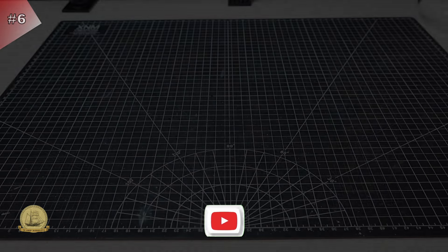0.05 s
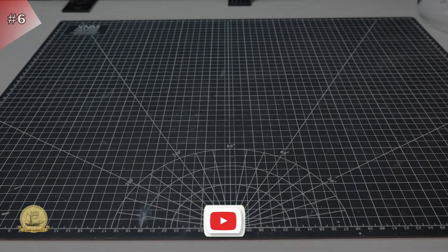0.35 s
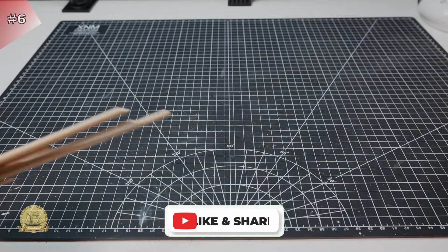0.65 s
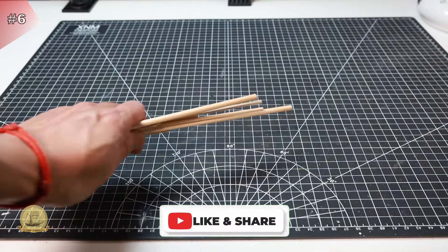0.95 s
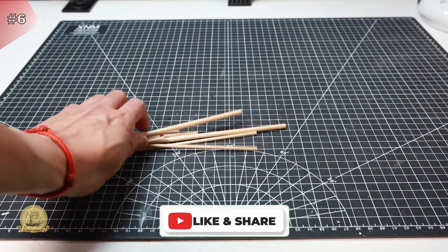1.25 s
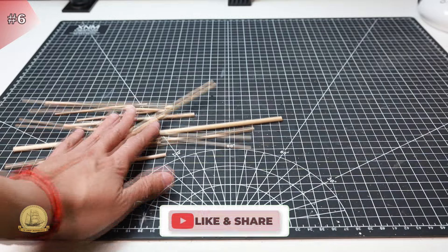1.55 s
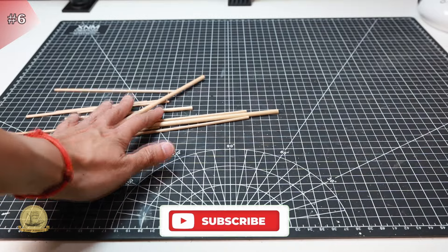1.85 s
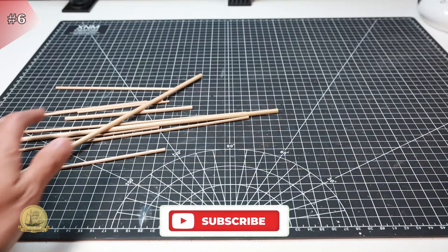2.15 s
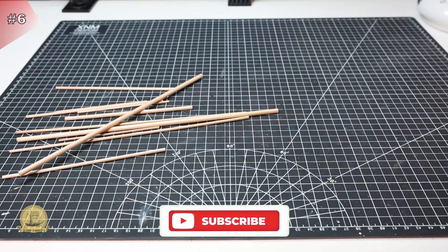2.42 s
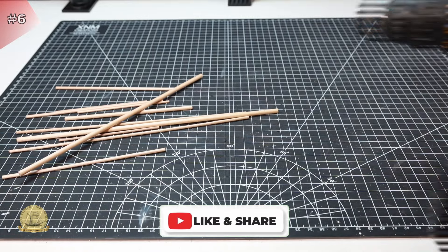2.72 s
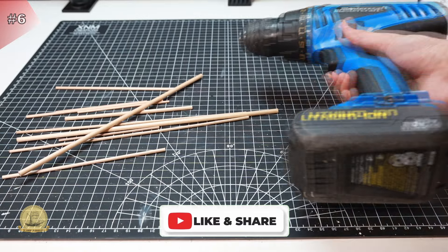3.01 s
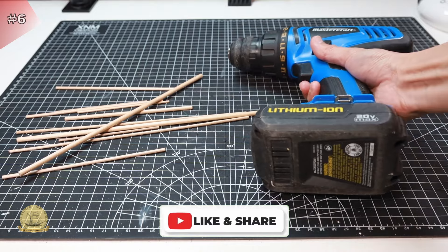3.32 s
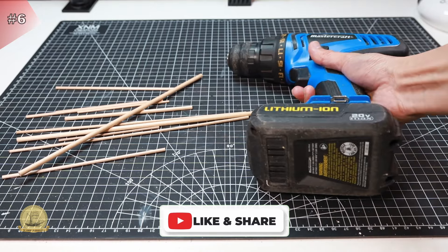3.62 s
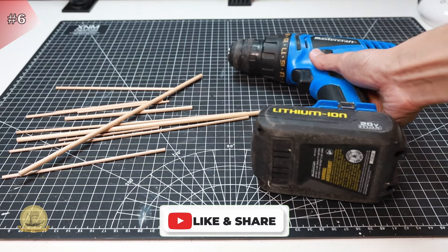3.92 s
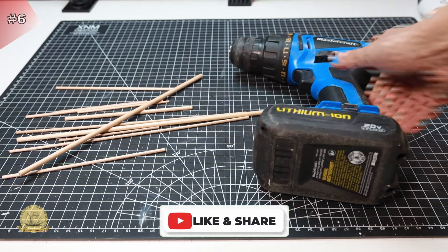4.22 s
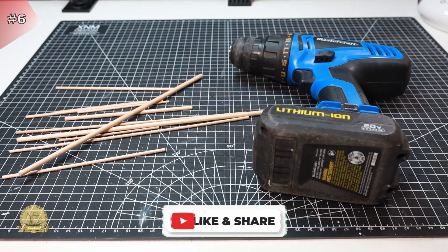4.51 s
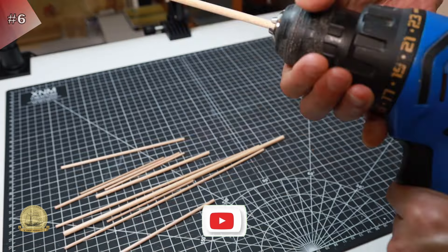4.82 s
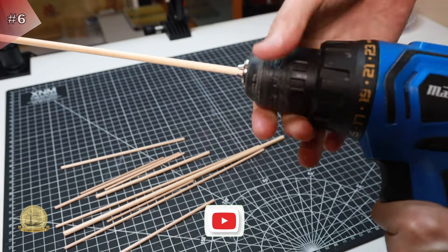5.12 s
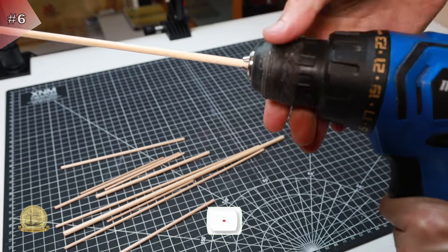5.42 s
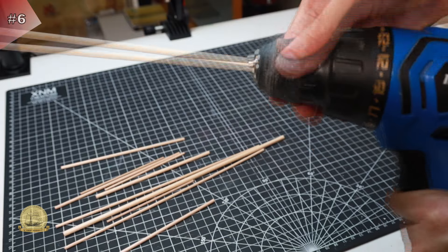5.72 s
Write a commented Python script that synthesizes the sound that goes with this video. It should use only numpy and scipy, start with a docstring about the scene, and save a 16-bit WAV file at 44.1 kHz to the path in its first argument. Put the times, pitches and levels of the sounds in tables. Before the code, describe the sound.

Faint room hiss with a very thin, high whine runs throughout. At about 1.2 seconds a few light wooden clacks lead into a sharp, ringing clatter as a handful of dowels lands on a cutting mat and bounces. A hand rolls them apart, with clicks and a light rattle until about 2 seconds. Small plastic clicks come from a cordless drill between 2.5 and 3.4 seconds. The drill is stood on the desk with two booming knocks at 3.4 and 3.6 seconds, followed by softer bumps just after 4 seconds and the faint rub of a palm on the grip. From about 4.9 seconds to the end, near 5.8, the chuck is twisted tight in about seven short, dry rasps, while the battery bumps the desk with repeated low thuds. Everything is close to one microphone in a small room.

```python
"""A few wooden clacks over quiet room hiss, then a handful of dowels lands on a cutting mat, bounces
and is rolled apart by hand, every contact ringing the rods. Plastic clicks, and a cordless drill is
stood on the desk in two knocks that boom the top and sway the legs. Its chuck is twisted tight round
a dowel in short stick-slip rasps while a palm rubs the grip and the battery bumps the desk.
Small room, one close microphone."""
import sys
import numpy as np
from scipy import signal
from scipy.fft import rfft, irfft
from scipy.io import wavfile

SR = 44100
rng = np.random.default_rng(int(sys.argv[2]) if len(sys.argv) > 2 else 0)


def store_pcm(level_fs):
    """Save levels as 16-bit WAV."""
    pcm = np.round(np.clip(level_fs, -1, 1) * 32767).astype(np.int16)
    wavfile.write(sys.argv[1], SR, np.atleast_2d(pcm).T)


N = 253795
T = np.arange(N) / SR
LANDING_S = 1.2886   # the bundle hits the mat

# spectrum of still room air and hiss: frequency_hz, level_db
AIR = [(15, -28), (25, -3), (86, -1.5), (116, -2.5), (289, -6.5), (349, -8.5), (469, -10), (552, -7),
       (782, -12), (848, -12.5), (945, -14), (2920, -20.5), (13200, -26.5), (15500, -31)]


def from_db(db):
    """Decibels to gain."""
    return 10 ** (np.asarray(db) / 20)


def unit(x):
    """Scale to energy 1."""
    return x / np.sqrt(np.sum(x ** 2) + 1e-20)


def curve(points):
    """Draw a line through (time, value) points at every sample."""
    return np.interp(T, *np.transpose(points))


def at_hz(points, hz):
    """Read a table on a log-frequency axis."""
    f, value = np.transpose(points)
    return np.interp(np.log(np.maximum(hz, 1)), np.log(f), value)


def add(track, start_s, sound):
    """Mix a sound into a track."""
    i = int(start_s * SR)
    track[i:i + len(sound)] += sound[:N - i]


def placed(peak_s, cluster, response=(1,)):
    """A track holding one burst, centred on peak_s, sounding through a response."""
    track = np.zeros(N)
    add(track, peak_s - len(cluster) / 2 / SR, signal.fftconvolve(cluster, response))
    return track


def through(x, response):
    """Pass a signal through an impulse response."""
    return signal.fftconvolve(x, response)[:len(x)]


def soften(x, hz, order=1):
    """Low-pass: a softer contact loses treble."""
    return signal.sosfilt(signal.butter(order, np.clip(hz, 20, .45 * SR), fs=SR, output="sos"), x)


def band(x, low_hz, high_hz):
    """Keep one band of frequencies."""
    return signal.sosfilt(signal.butter(2, [low_hz, high_hz], "band", fs=SR, output="sos"), x)


def colour(spectrum, size=8192):
    """Causal (minimum-phase) response with the given spectrum, energy 1."""
    gain = from_db(at_hz(spectrum, np.fft.rfftfreq(size, 1 / SR)))
    cepstrum = irfft(np.log(gain))
    cepstrum[1:size // 2] *= 2
    cepstrum[size // 2 + 1:] = 0
    return unit(irfft(np.exp(rfft(cepstrum))))


def ringing(modes, scatter_db=0, detune=0, size=26000):
    """Decaying modes; where a blow lands and how the piece rests vary their strength and pitch."""
    hz, db, t60 = np.transpose(modes)[:, :, None]
    t = T[:size]
    strength = from_db(db + scatter_db * rng.standard_normal(hz.shape))
    hz = hz * (1 + detune * rng.standard_normal(hz.shape))
    signs = (-1) ** np.arange(len(hz))[:, None]   # neighbouring modes move in opposite directions
    decay = np.exp(-np.log(1000) * t / np.maximum(t60, .005))
    return np.sum(signs * strength * np.cos(2 * np.pi * hz * t) * decay, axis=0)


def grains(size, spread_db):
    """Tiny contacts of uneven strength, rms 1."""
    noise = rng.standard_normal(size)
    strength = from_db(spread_db * np.clip(rng.standard_normal(size), -2, 2))
    return unit(noise * strength) * np.sqrt(size)


def burst(swell_s, fall_s, spread_db, size=4096):
    """A cluster of contacts whose envelope peaks at 1 in the middle of its window."""
    t = T[:size] - T[size // 2]
    envelope = np.exp(np.minimum(t / max(swell_s, 1e-5), -t / fall_s))
    return unit(envelope * grains(size, spread_db)) * np.sqrt(np.sum(envelope ** 2))


def gesture(start_s, length_s, rise_s, fall_s):
    """Envelope of one movement: rises, holds to the end of its length, dies away."""
    rise = np.clip((T - start_s) / rise_s, 0, 1)
    return rise * np.exp(-np.maximum(T - start_s - length_s, 0) / fall_s)


def wander(hz, order=1):
    """Slow random motion, rms 1."""
    return np.sqrt(N) * unit(soften(rng.standard_normal(N), hz, order))


def background(air_db=-61, whine_db=-73, waver_hz=14):
    """Room air and hiss, with a thin, wavering electronic whine."""
    # path of the whine: time_s, pitch_hz
    whine_path = [(0, 13795), (4.85, 13775), (4.87, 13501), (5.75, 13501)]
    # hiss and whine sink a little during the chuck work: time_s, level_db
    level_ride = [(0, 0), (4.85, 0.5), (4.88, -2), (5.75, -2.5)]
    air = from_db(air_db) * through(rng.standard_normal(N), colour(AIR))
    pitch_hz = curve(whine_path) + waver_hz * wander(hz=30)
    whine = from_db(whine_db) * np.sin(2 * np.pi * np.cumsum(pitch_hz) / SR)
    return from_db(curve(level_ride)) * (air + whine)


def dowel_contacts(bounces=8, gap_s=.0115, bounce_db=-23.5, loss_db_per_s=142):
    """Rods clack together; the bundle lands flat and bounces ever more weakly.
    Rows: peak_s, level_db, fall_s, brightness_hz, heap_ring_db, stick_ring_db, pitch_hz."""
    # dowel striking dowel: peak_s, level_db, brightness_hz, ring_db, pitch_hz (lowest mode)
    clacks = [(1.1796, -46.5, 11000, -3, 3560), (1.2373, -38, 3000, 3.5, 1696),
              (1.2698, -47, 7000, 7, 2350), (1.279, -39, 6000, 2, 2860), (1.4295, -42.5, 10100, -3, 2070),
              (1.468, -42.5, 6000, -8, 2330), (1.501, -39, 9000, -5.5, 3560),
              (1.532, -40.5, 7000, -4, 2380), (1.566, -33.5, 4520, -12, 1910),
              (1.6712, -29, 3400, -2.5, 3330), (1.700, -44, 5000, -2, 3330), (1.7125, -40, 8000, -4, 3430),
              (1.7287, -39, 8000, -1.5, 3500), (1.765, -46, 4000, -9, 3480),
              (1.775, -50.5, 7000, 1.5, 3390), (1.861, -44.5, 8050, 2, 3460),
              (2.003, -45.5, 2490, -16, 2000)]
    clack_fall_s, neighbours_db = .006, -5.5   # the rods around ring less than the struck one
    free_heap_db, free_stick_db = 6.5, -1.5   # ring of the rods while they lie free
    rows = [(peak_s, level_db, clack_fall_s, bright_hz, ring_db + neighbours_db, ring_db, pitch_hz)
            for peak_s, level_db, bright_hz, ring_db, pitch_hz in clacks]
    rows.append((LANDING_S, -17, .0037, 15750, free_heap_db, free_stick_db, 2930))
    for k, (jitter, thickness) in enumerate(rng.uniform(-.3, .3, (bounces, 2))):
        delay_s = gap_s * (k + .5 + jitter)
        level_db = bounce_db - loss_db_per_s * delay_s
        pitch_hz = 2930 * (1 + thickness)
        rows.append((LANDING_S + delay_s, level_db, .003, 12000, free_heap_db, free_stick_db, pitch_hz))
    return rows


def dowels(rattle_ring_db=-3, detune=.025, ring_samples=6000):
    """Each contact cracks and rings the rods, no two alike; rolling, they rattle and rumble."""
    # bending modes of the heap: pitch_hz, level_db, t60_s
    heap_modes = [(970, -17, 0.1), (1488, -12, 0.16), (1820, -13, 0.12), (2513, -9, .15), (2780, -7, 0.057),
                  (3340, -8, 0.17), (4125, -5, .15), (3934, 2.5, 0.077), (4140, -7, 0.19),
                  (4910, -2.5, 0.1703), (5240, -1.5, 0.15), (5400, -15, 0.1), (5450, -0.5, 0.13),
                  (5820, -1, 0.18), (6550, -7, 0.19), (7260, -1.5, 0.17), (7530, -2.5, .14),
                  (7510, -2.5, .13), (8160, 0.5, 0.17), (8650, -0.5, 0.22), (8970, -0.5, 0.065),
                  (10000, -20.5, 0.099), (10320, -0.5, 0.1), (10550, 0.5, .13), (11450, 0, 0.079),
                  (13300, -9, 0.097), (14280, -22, 0.098)]
    # bending modes of one stick: ratio_to_lowest_mode, level_db, t60_s
    stick_modes = [(1, -4, .07), (1.68, -2, .06), (1.73, -6, .06), (2.33, -3, .07), (2.40, -2, .08),
                   (2.48, -3, .08), (3.12, -8, .06), (3.28, -7, .06)]
    # spectrum of bare wood contact: frequency_hz, level_db
    crack_spectrum = [(25, -45.5), (60, -20), (150, -4.5), (400, 1.5), (900, 3.5), (2200, 0.5), (4500, 2.5),
                      (8000, -2), (11000, -13), (13000, -11), (16000, -15)]
    # spectrum of rolling on the mat: frequency_hz, level_db
    rumble_spectrum = [(20, -51), (50, -29), (100, -13.5), (150, 1), (260, -12.5), (430, 0), (650, -16),
                       (1400, -10.5), (3000, -24), (16000, -85)]
    rattle, rumble = rolling()
    crack = colour(crack_spectrum, ring_samples)
    heap = unit(sum(ringing(heap_modes, detune=detune, size=ring_samples) for _ in range(6)))
    wood = through(rattle * grains(N, spread_db=8), crack + from_db(rattle_ring_db) * heap)
    for peak_s, level_db, fall_s, bright_hz, heap_db, stick_db, pitch_hz in dowel_contacts():
        neighbours = unit(ringing(heap_modes, detune=detune, size=ring_samples))
        stick = unit(ringing(np.array(stick_modes) * [pitch_hz, 1, 1], size=ring_samples))
        contact = from_db(level_db) * soften(burst(0, fall_s, spread_db=.5), bright_hz)
        response = crack + from_db(heap_db) * neighbours + from_db(stick_db) * stick
        wood += placed(peak_s, contact, response)
    return wood + rumble * through(grains(N, spread_db=3.9), colour(rumble_spectrum))


def rolling():
    """Envelopes of rattle and rumble: the tumble after the landing, then each push of the palm."""
    # the palm rolls the dowels apart: start_s, length_s, rattle_db, rumble_db
    pushes = [(1.419, 0.096, -57, -59.5), (1.557, 0.056, -67, -59.5), (1.661, 0.068, -60, -51),
              (1.851, 0.037, -64, -62)]
    tumble = gesture(LANDING_S, length_s=.043, rise_s=.006, fall_s=.046)
    rattle, rumble = from_db(-34) * tumble, from_db(-43.5) * tumble
    for start_s, length_s, rattle_db, rumble_db in pushes:
        push = gesture(start_s, length_s, rise_s=.017, fall_s=.064)
        rattle += from_db(rattle_db) * push
        rumble += from_db(rumble_db) * push
    return rattle, rumble


def clicks_and_twists(twist_bright_hz=6250, ring_t60_s=.006):
    """Plastic clicks and the chuck rasps in stick-slip runs; the grip shifts and damps a resonance."""
    # plastic parts clicking in the hand: peak_s, level_db, brightness_hz, resonance_hz
    clicks = [(2.514, -53, 1990, 1290), (2.742, -47.5, 4020, 3490), (2.750, -41, 7100, 2320),
              (2.9, -55, 4020, 1490), (2.935, -50, 4040, 700), (3.299, -38.5, 1850, 567),
              (3.359, -49.5, 2500, 1860), (3.718, -54.5, 4000, 2980), (5.3676, -45.5, 9100, 4250)]
    # twists of the chuck: peak_s, level_db, swell_s, fall_s, resonance_hz
    twists = [(4.975, -41.5, 0.0029, 0.0075, 2950), (5.133, -39, 0.0025, 0.0077, 3500),
              (5.2798, -38, 0.0038, 0.0039, 3190), (5.4538, -33.5, 0.0037, 0.0018, 4350),
              (5.538, -31, 0.0025, 0.0016, 3920), (5.69, -36.5, 0.0045, 0.0027, 2240),
              (5.7455, -36, 0.0022, 0.0033, 4110)]
    # spectrum of chuck and housing: frequency_hz, level_db
    chuck_spectrum = [(100, -60), (600, -12.5), (1150, 6.5), (1700, 4.5), (2300, 4), (2800, 6.5), (3300, 1),
                      (4100, 3.5), (5500, 1), (7500, -5.5), (10000, -17), (16000, -11)]
    track, housing = np.zeros(N), colour(chuck_spectrum)

    def slip(peak_s, level_db, bright_hz, ring_hz, swell_s, fall_s, ring_db):
        """One run of contacts, heard through the housing and its resonance."""
        contacts = from_db(level_db) * soften(burst(swell_s, fall_s, spread_db=3), bright_hz)
        ring = unit(ringing([(ring_hz, 0, ring_t60_s)], size=8192))
        return placed(peak_s, contacts, housing + from_db(ring_db) * ring)

    for peak_s, level_db, swell_s, fall_s, ring_hz in twists:
        track += slip(peak_s, level_db, twist_bright_hz, ring_hz, swell_s, fall_s, ring_db=-8)
    for click in clicks:
        track += slip(*click, swell_s=.0004, fall_s=.0029, ring_db=-3)
    return track


def drill_knocks(lean_s=4.3, shudder_hz=35.2, tick_db=-11.5, tick_db_per_octave=3.5):
    """The heavy battery sways the desk, booms its top, rings its own case and rattles the shell."""
    # drill meeting the desk: start_s, sway_db, boom_db, case_db, brightness_hz
    knocks = [(3.3900, -38, -19.5, -26, 1770), (3.435, -61, -31, -54, 500),
              (3.5909, -29, -20.5, -26.5, 1510), (4.0349, -40, -32, -47, 1510),
              (4.0721, -58, -32, -48.5, 250), (4.175, -42.5, -50.5, -54.5, 400),
              (4.406, -42, -58, -44.5, 298), (4.442, -35, -51.5, -48.5, 395), (4.588, -32.5, -47, -56, 585),
              (4.8601, -25, -40.5, -40, 715), (5.002, -23, -32.5, -35.5, 340),
              (5.1353, -32.5, -43, -48.5, 400), (5.274, -26, -38.5, -48, 483),
              (5.418, -23.5, -37.5, -37.5, 905), (5.562, -26.5, -37.5, -44.5, 508),
              (5.607, -27.5, -54, -64, 250), (5.6942, -21, -36, -35, 710), (5.736, -20, -53, -45, 400)]
    # modes of the desk top: pitch_hz, level_db, t60_s
    desk_modes = [(138.3, 1.5, 0.18), (151.3, -4.5, 0.27), (230, -16.5, 0.17)]
    # modes of battery case and desk top together: pitch_hz, level_db, t60_s
    case_modes = [(196.7, -6.5, 0.33), (230.6, 0, 0.12), (282.5, -3.5, 0.19), (351, -5.5, 0.11),
                  (406.5, -4, 0.14), (474, -4.5, 0.1), (555, -3.5, 0.055), (684, -6.5, 0.054),
                  (797, -8, 0.076), (966, -4.5, 0.04), (1100, -4.5, 0.028), (1408, -14.5, 0.1),
                  (1590, -9, 0.029), (1945, -7, 0.016)]
    # spectrum of the plastic shell: frequency_hz, level_db
    shell_spectrum = [(30, -43), (100, -23), (300, -9), (700, 1), (1300, 5), (2500, -3), (5000, -7),
                      (8000, -23), (12000, -41), (16000, -34)]
    boom = band(sum(ringing([mode]) for mode in desk_modes), low_hz=81, high_hz=350)
    shudder = soften(ringing([(shudder_hz, -25, .77)]), 2 * shudder_hz, order=2)
    thuds, ticks = np.zeros(N), np.zeros(N)
    for start_s, sway_db, boom_db, case_db, bright_hz in knocks:
        # from lean_s a hand bears on the drill: the sway is lower and shorter, the case rings less
        sway_hz, sway_t60_s, ring_share = (84.05, .69, 1) if start_s < lean_s else (81.5, .28, .85)
        sway = ringing([(sway_hz, sway_db, sway_t60_s)])
        sway = band(sway, low_hz=45, high_hz=150)   # a heavy desk takes a cycle to get going
        case = ringing(np.array(case_modes) * [1, 1, ring_share], scatter_db=3, detune=.014, size=14000)
        add(thuds, start_s, sway + from_db(boom_db) * (boom + shudder))
        add(thuds, start_s, from_db(case_db) * soften(case, bright_hz, order=2))
        hardness = np.log2(bright_hz / 1000)   # harder contacts tick more
        tick_gain = from_db(boom_db + tick_db + tick_db_per_octave * hardness)
        ticks += placed(start_s, tick_gain * burst(0, fall_s=.0047, spread_db=5.5))
    return thuds + through(ticks, colour(shell_spectrum))


def palm(flutter_db=3, flutter_hz=15):
    """Skin rubs softly on rubber and plastic, with uneven pressure."""
    # strokes over the grip: start_s, length_s, level_db
    strokes = [(3.801, .48, -64), (4.395, 0.031, -66), (4.855, 0.036, -60.5), (4.982, 0.081, -55.5),
               (5.29, 0.084, -66), (5.534, .035, -67)]
    # spectrum of rubbing skin: frequency_hz, level_db
    skin_spectrum = [(200, -10), (1000, -8), (1800, -10), (2600, -2.5), (3600, -7), (5500, -5.5),
                     (8000, -11), (12000, -21.5), (16000, -38)]
    pressure = from_db(flutter_db * np.tanh(wander(flutter_hz, order=2)))
    envelope = sum(from_db(level_db) * gesture(start_s, length_s, rise_s=.026, fall_s=.016)
                   for start_s, length_s, level_db in strokes)
    return envelope * pressure * through(grains(N, spread_db=6.5), colour(skin_spectrum))


def room(x, bass_db=-18, treble_db=-10, build_s=.0089, size=26000):
    """Diffuse reflections build up quickly and die away band by band."""
    # decay of the small room: frequency_hz, t60_s
    decay_times = [(100, 0.85), (500, 0.36), (2000, 0.19), (6000, 0.19), (14000, 0.093)]
    t, tail = T[:size], np.zeros(size)
    build_up = 1 - np.exp(-(t / build_s) ** 2)
    edges_hz = np.geomspace(60, 17000, 10)
    for low_hz, high_hz in zip(edges_hz, edges_hz[1:]):
        centre_hz = np.sqrt(low_hz * high_hz)
        decay = np.exp(-np.log(1000) * t / at_hz(decay_times, centre_hz))
        gain = from_db(at_hz([(120, bass_db), (700, treble_db)], centre_hz))
        tail += band(rng.standard_normal(size), low_hz, high_hz) * unit(decay * build_up) * gain
    return through(x, tail)


def scene(dowel_send_db=2, knock_send_db=1, chuck_send_db=-4, side_room_db=-22, side_hiss_db=-81):
    """All sources share the room, the chuck being nearest; the stereo image is almost mono."""
    wood, knocks, chuck, rub = dowels(), drill_knocks(), clicks_and_twists(), palm()
    send = (from_db(dowel_send_db) * wood + from_db(knock_send_db) * knocks
            + from_db(chuck_send_db) * chuck + rub)
    mid = wood + knocks + chuck + rub + room(send) + background()
    side = from_db(side_room_db) * soften(room(send, bass_db=-29), hz=1917)
    # faint steady hiss that differs between left and right
    side += from_db(side_hiss_db) * through(rng.standard_normal(N), colour(AIR))
    return np.array([mid + side, mid - side])


def record(dry):
    """A steep low-pass cuts the top above 16 kHz."""
    return signal.sosfilt(signal.ellip(12, .1, 90, 16000, fs=SR, output="sos"), dry)


dry = scene()
out = record(dry)
store_pcm(out)
```